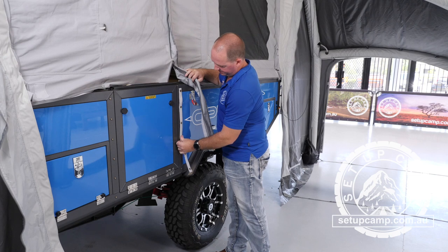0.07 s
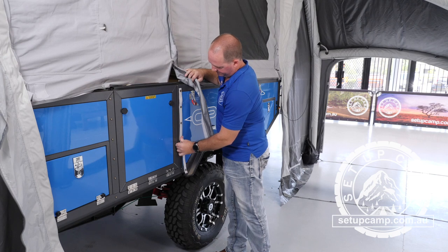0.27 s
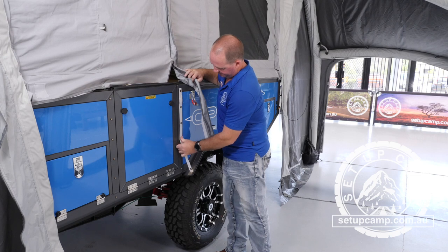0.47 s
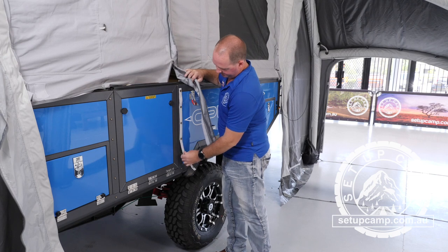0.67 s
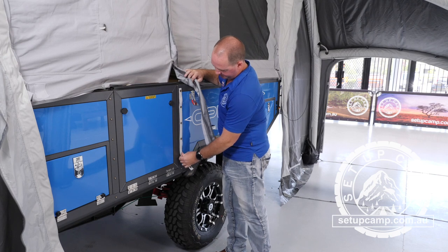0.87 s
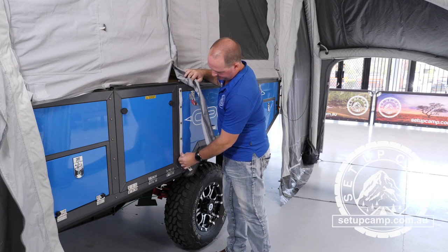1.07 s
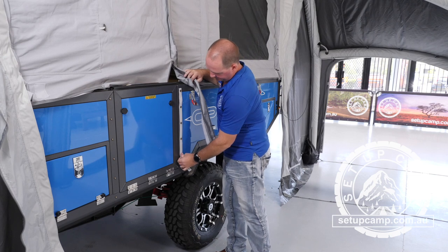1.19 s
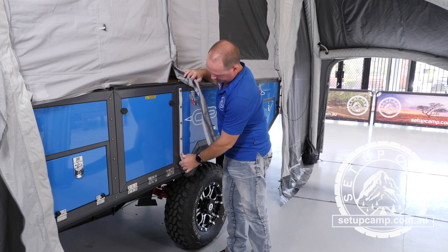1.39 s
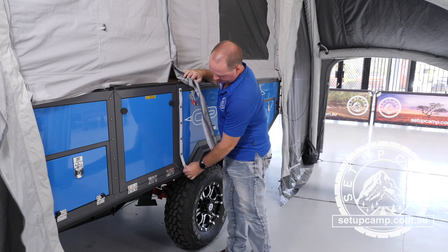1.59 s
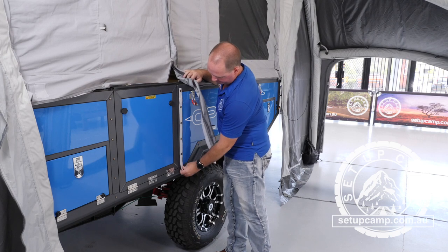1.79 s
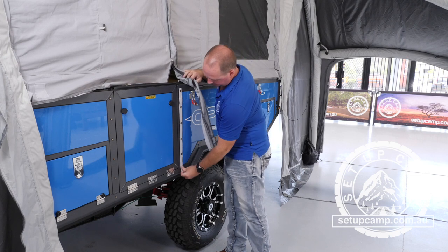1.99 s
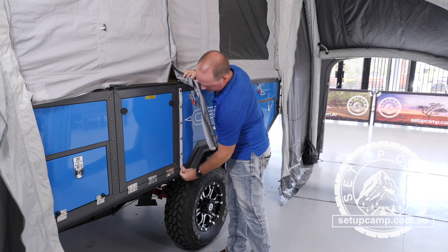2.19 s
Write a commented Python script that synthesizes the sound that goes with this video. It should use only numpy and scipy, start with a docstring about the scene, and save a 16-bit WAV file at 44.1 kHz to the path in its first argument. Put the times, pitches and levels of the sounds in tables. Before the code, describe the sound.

Hook-and-loop strip tugged and ripped apart in scratchy bursts, with sharp snaps and rustling canvas

```python
"""Hook-and-loop strips on a canvas tent flap are worked along a trailer's side, in a large showroom.
From the start the hall rumbles (filtered noise), the canvas rustles and hooks let go (random tiny clicks).
From 0.23 s a stiff edge snaps, the trailer body booms and the panel is knocked (damped ringing).
Long rips come at 0.56, 1.5, 1.7 and 2.1 s, with single ticks between; from 0.7 to 1.46 s a faint low
drone (a gliding sine) ends higher than it began. Short echoes surround all but the booms and the hall."""
import sys
import numpy as np
from scipy import signal
from scipy.fft import rfft, irfft
from scipy.io import wavfile

SR = 44100
rng = np.random.default_rng(int(sys.argv[2]) if len(sys.argv) > 2 else 0)


def transcribe(u):
    """Save the signal u as a 16-bit wav file named by the first command-line argument.

    u: samples, shape (n,) or (channels, n), limited to [-1, 1]; the rate is SR.
    q: integer samples, one column per channel.
    """
    v = np.clip(np.atleast_2d(u).T, -1, 1)
    q = np.round(v * 32767).astype(np.int16)
    wavfile.write(sys.argv[1], SR, q)


N = 99225  # length in samples: 2.25 s


def undb(db):
    """Turn decibels into a plain multiplier."""
    return 10 ** (np.asarray(db) / 20)


def unit(x):
    """Scale to an rms of 1."""
    return x / np.sqrt(np.mean(x ** 2))


def colour(x, points):
    """Filter x through (f/Hz, level/dB) points, with no sound before its cause (minimum phase)."""
    hz, db = np.array(points).T
    size = 8192
    log_f = np.log(np.fft.rfftfreq(size, 1 / SR) + 1)
    gain = undb(np.interp(log_f, np.log(hz), db))
    # folding the cepstrum forward moves all the energy as early as it can go
    cepstrum = irfft(np.log(gain))
    cepstrum[1:size // 2] *= 2
    cepstrum[size // 2 + 1:] = 0
    response = irfft(np.exp(rfft(cepstrum)))
    return signal.fftconvolve(x, response)[:len(x)]


def resonance(f, hz, width_hz):
    """Response of one damped way of ringing, gain 1 at its centre; a wider one dies sooner."""
    return 1j * f * width_hz / (hz ** 2 - f ** 2 + 1j * f * width_hz)


def ring(x, hz, width_hz):
    """Pass x through one resonance."""
    f = np.fft.rfftfreq(2 * N, 1 / SR)
    return irfft(rfft(x, 2 * N) * resonance(f, hz, width_hz))[:N]


def add(out, start, x):
    """Mix x into out from a start time in s."""
    i = max(int(start * SR), 0)
    out[i:i + len(x)] += x[:max(N - i, 0)]


def curve(times, db):
    """Multiplier following a dB curve, practically silent outside it."""
    return undb(np.interp(np.arange(N) / SR, times, db, left=-120, right=-120))


def grains(per_s, scatter_db):
    """Random tiny clicks, a few much stronger than the rest."""
    size = undb(scatter_db * np.minimum(rng.exponential(size=N), 5))
    happens = rng.random(N) < per_s / SR
    return happens * size * rng.choice([-1, 1], N)


# tone of the hall's steady noise: f/Hz, relative level/dB (per Hz)
HALL_COLOUR = [(15, 0), (25, -2.5), (134, 2.5), (256, -3.5), (309, -6.5), (384, -6.5), (516, -16),
               (887, -11.5), (988, -18), (1160, -16), (2840, -26), (3430, -24.5), (7710, -31.5),
               (10400, -36.5), (16000, -31.5)]
HALL_DB = -57.5  # rms level of that noise
# low drone: t/s, f/Hz, rms level/dB
DRONE_PATH = [(0.699, 124, -70), (.88, 123.6, -61.5), (1.0, 120.5, -60.5), (1.10, 127.2, -56.5),
              (1.18, 131.8, -51), (1.24, 140, -60.5), (1.31, 148.7, -55.5), (1.39, 157, -56.5),
              (1.461, 165, -81)]


def hall():
    """Steady rumble and hiss from filtered noise, with a low sine drone that climbs like a far engine."""
    times, hz, db = np.array(DRONE_PATH).T
    pitch = np.interp(np.arange(N) / SR, times, hz)
    phase = 2 * np.pi * np.cumsum(pitch) / SR
    drone = np.sqrt(2) * np.sin(phase) * curve(times, db)
    noise = unit(colour(rng.standard_normal(N), HALL_COLOUR))
    return undb(HALL_DB) * noise + drone


# handling of the canvas: t/s, level/dB
RUSTLE_LEVEL = [(0, -49), (.12, -66.5), (.22, -63.5), (.38, -53.5), (.47, -59), (.55, -51), (.8, -64.5),
                (1.02, -65.5), (1.16, -70.5), (1.3, -72), (1.41, -66), (1.52, -52), (1.68, -64.5),
                (1.88, -64.5), (1.97, -59), (2.04, -75.5), (2.25, -64.5)]
# tone of the creases: f/Hz, relative level/dB
CREASE_COLOUR = [(300, 4), (900, 0), (2000, 0), (4500, -2), (7500, 5), (11000, 3.5), (13000, -1),
                 (16000, -8.5)]
CREASES_PER_S, CREASE_SCATTER_DB = 2500, 3.5
# cloth sliding over the panel: middle t/s, level/dB, half length t/s, centre f/Hz, width f/Hz
CLOTH_SLIDES = [(.74, -63, 0.16, 820, 243), (1.402, -58.5, .045, 4200, 4414),
                (1.422, -60.5, 0.096, 880, 916), (1.566, -51.5, 0.028, 1610, 1370)]


def canvas():
    """Small creases crackle as the flap is handled; now and then the cloth slides softly, as a noise swell."""
    t = np.arange(N) / SR
    creases = unit(colour(grains(CREASES_PER_S, CREASE_SCATTER_DB), CREASE_COLOUR))
    out = curve(*np.array(RUSTLE_LEVEL).T) * creases
    for middle, db, half, hz, width in CLOTH_SLIDES:
        swell = np.exp(-((t - middle) / half) ** 2)
        out += undb(db) * swell * unit(ring(rng.standard_normal(N), hz, width))
    return out


# short tugs on the strip: t/s, level/dB, attack t/s, decay t/s, and, relative to that level,
# backing's rasp level/dB; then f/Hz of the taut strip and its ring's relative level/dB
STRIP_TUGS = [(.002, -46, 0.0015, 0.019, -3.5, 10300, -11), (.175, -59, 0.01, 0.0057, 0, 11600, 4),
              (0.2261, -35, .001, 0.0053, -9, 9500, -12.5), (0.3053, -31.5, 0.00073, .0015, -4, 5800, 0),
              (.350, -63, 0.0042, 0.019, 9.5, 10800, 15.5),
              (0.446, -44.5, 0.0033, 0.0057, -13.5, 7400, -25), (0.523, -40.5, 0.0076, 0.013, -12, 6017, 0),
              (.9250, -27.5, 0.0041, 0.0039, -8, 12200, -11.5),
              (0.937, -39, 0.0024, 0.0082, -1.5, 3220, -12.5), (1.177, -52, .004, 0.0083, 3.5, 5950, -1),
              (1.415, -46, 0.0049, 0.0093, -21, 10700, -15),
              (1.456, -37.5, 0.00071, 0.0071, -7.5, 9700, -2), (1.477, -49, 0.0047, 0.014, -5.5, 9700, -2)]
# long peels, one list each: t/s, hooks' crackle level/dB, backing's rasp level/dB (both before the trims)
LONG_PEELS = [
    [(0.56, -63, -58), (0.582, -33, -45.5), (0.6, -30, -38.5), (0.642, -32, -45), (0.742, -41.5, -56),
     (0.76, -57.5, -74), (0.775, -61, -69)],
    [(1.515, -57, -71), (1.529, -43.5, -59.5), (1.571, -36, -44.5), (1.615, -38, -59.5), (1.625, -43, -72),
     (1.647, -48.5, -65), (1.665, -67, -86)],
    [(1.685, -60.5, -76), (1.693, -39, -72), (1.705, -59.5, -88), (1.713, -45, -71), (1.727, -49, -74),
     (1.733, -43, -58.5), (1.773, -44, -67), (1.781, -70.5, -67), (1.785, -64, -60)],
    [(2.08, -92, -83), (2.086, -65, -93), (2.09, -60, -71), (2.104, -59.5, -95), (2.118, -54, -71),
     (2.14, -48.5, -64), (2.155, -75, -79)],
]
HOOK_TRIM_DB, BACKING_TRIM_DB = -5, -.5  # added to the two levels of the long peels
# tone of the hooks' crackle: f/Hz, relative level/dB
HOOK_TONE = [(2500, -28.5), (5000, -5), (7000, -4.5), (8200, 0), (8900, -1.5), (9600, -1.5), (11000, 1),
             (12500, -2), (14000, -6), (16000, -24)]
# tone of the woven backing: f/Hz, relative level/dB
BACKING_TONE = [(300, -32.5), (800, -14), (1300, -3.5), (2200, 1.5), (3200, 5.5), (4500, 5), (5600, -6),
                (8000, -11)]
# ringing pitch in long peels, which climbs in the first, rises then falls in the second,
# and falls then holds after that: t/s, f/Hz
STRIP_GLIDE = [(.58, 8500), (.64, 9300), (.68, 9700), (.75, 10240), (1.53, 8640), (1.60, 10400),
               (1.74, 9300)]
STRIP_RING_DB, PEEL_WIDTH_HZ = -5.5, 850  # ring in a long peel, relative to its crackle
STRIP_WIDTH_HZ = 1000  # ring in a tug
HOOKS_PER_S, HOOK_SCATTER_DB = 15000, 2.3  # rate is at the hardest pull
DENSITY_POWER = 1  # a gentler pull frees fewer hooks
CATCH_PER_S, CATCH_DB = 200, 1.2  # rows of hooks hold and give way


def rips():
    """Hooks let go, denser under a harder pull; they crackle, ring the taut strip and pluck the backing."""
    t = np.arange(N) / SR
    peeling, rasp = np.zeros(N), np.zeros(N)
    for peel in LONG_PEELS:
        times, hook_db, backing_db = np.array(peel).T
        peeling += curve(times, hook_db + HOOK_TRIM_DB)
        rasp += curve(times, backing_db + BACKING_TRIM_DB)
    pulls = []
    for start, db, attack, decay, *_ in STRIP_TUGS:
        rise = np.clip((t - start) / attack, 0, 1)
        fall = np.exp(-np.maximum(t - start - attack, 0) / decay)
        pulls.append(undb(db) * rise * fall)
    crackle = peeling + sum(pulls)

    rate = HOOKS_PER_S * np.maximum(crackle / crackle.max(), .03) ** DENSITY_POWER
    row = np.arange(N) // int(SR / CATCH_PER_S)
    catch = undb(CATCH_DB * rng.standard_normal(N)[row])
    # dividing by the root of the rate keeps density from changing the loudness
    hooks = catch * grains(rate, HOOK_SCATTER_DB) / np.sqrt(rate)

    # a resonance that glides: turn its pitch down to zero, smooth, and turn it back up
    turn = np.exp(2j * np.pi * np.cumsum(np.interp(t, *np.array(STRIP_GLIDE).T)) / SR)
    memory = np.exp(-np.pi * PEEL_WIDTH_HZ / SR)
    gliding = turn * signal.lfilter([1], [1, -memory], hooks / turn)
    strip = peeling * undb(STRIP_RING_DB) * unit(gliding.real)
    for pull, (*_, body_db, hz, ring_db) in zip(pulls, STRIP_TUGS):
        rasp += pull * undb(body_db)
        strip += pull * undb(ring_db) * unit(ring(hooks, hz, STRIP_WIDTH_HZ))
    plucks = hooks * rng.choice([-1, 1], N)
    hook_sound = crackle * unit(colour(hooks, HOOK_TONE))
    backing_sound = rasp * unit(colour(plucks, BACKING_TONE))
    return strip + hook_sound + backing_sound


# single hooks letting go: t/s (before the lag), peak level/dB (before the trim), f/Hz
SINGLE_HOOKS = [(0.0273, -25, 10000), (0.066, -31, 11600), (0.1311, -38, 5900), (0.1865, -25.5, 10500),
                (0.3263, -17, 10100), (0.3324, -14.5, 11300), (0.377, -18.5, 11000), (0.3814, -27, 11500),
                (0.4234, -18, 11050), (0.4494, -28, 11280), (0.4843, -30, 9950), (0.4964, -37, 6420),
                (1.0859, -45, 7890), (1.1194, -35.5, 7300), (1.1817, -27, 5500), (1.3936, -37, 9220),
                (1.4134, -25, 10700), (1.4187, -19.5, 10800), (1.4244, -29, 11100), (1.4541, -17, 10000),
                (1.5294, -27, 10500), (1.5964, -28, 10100), (1.6114, -20, 10500), (1.6444, -27.5, 10200),
                (1.6901, -36, 10400), (1.7145, -30, 9200), (1.7684, -35, 9200), (1.7888, -23, 9400),
                (1.8168, -29.5, 8950), (1.8442, -37, 9960), (1.8587, -42, 9510), (1.8846, -38, 7800),
                (2.136, -34, 10800), (2.2099, -39, 9680)]
TICK_TRIM_DB, TICK_LAG_S = -5, 0.0011  # added to every level and every time
TICK_WIDTH_HZ, TICK_CRACK = 730, 0.12  # TICK_CRACK is the share of a duller crack


def ticks():
    """A lone hook cracks free and rings for under a millisecond."""
    out, f = np.zeros(N), np.fft.rfftfreq(512, 1 / SR)
    for start, db, hz in SINGLE_HOOKS:
        crack = TICK_CRACK * resonance(f, hz=5800, width_hz=1700)
        click = irfft(resonance(f, hz, TICK_WIDTH_HZ) + crack)
        add(out, start + TICK_LAG_S, click / np.abs(click).max() * undb(db + TICK_TRIM_DB))
    return out


BASS_HZ, TREBLE_HZ = 3400, 7000  # bass acts below the first, treble above the second
CONTACT_HZ = 14500  # each blow fades out above this
BOOST_WIDTH_OCT = 0.27


def blows(modes, events):
    """Each blow rings the modes, weighted by where it lands; bending waves bring the lows a little later."""
    out, f = np.zeros(N), np.fft.rfftfreq(4096, 1 / SR) + 1
    body = sum(undb(db) * resonance(f, hz, width) for hz, width, db in modes)
    for start, db, bass_db, treble_db, lag_ms, boost_hz, boost_db in events:
        bass = bass_db / (1 + (f / BASS_HZ) ** 8)
        treble = treble_db / (1 + (TREBLE_HZ / f) ** 8)
        boost = boost_db * np.exp(-(np.log2(f / boost_hz) / BOOST_WIDTH_OCT) ** 2)
        tone = undb(db + bass + treble + boost) / (1 + (f / CONTACT_HZ) ** 10)
        bend = np.exp(-4j * np.pi * lag_ms * np.sqrt(f / 1000))
        # 128 samples of room ahead of the blow keep its onset whole
        add(out, start - 128 / SR, np.roll(irfft(body * tone * bend), 128))
    return out


# ways the strip's stiff edge rings: f/Hz, width f/Hz, relative level/dB
EDGE_MODES = [(262, 70, -18.5), (1000, 250, -15), (1536, 110, -8.5), (2350, 680, -11), (3170, 300, -16),
              (4640, 400, -1), (5150, 1200, -2.5), (6890, 400, -5.5), (7900, 330, -8.5), (9650, 1700, -1.5),
              (10900, 860, -3.5), (14200, 1200, -7)]
# snaps of the edge: t/s, relative level/dB, bass level/dB, treble level/dB,
# lag of the 1 kHz bending wave t/ms, f/Hz that the contact point favours, its boost level/dB
EDGE_SNAPS = [(.2308, 17, 0, 0, 0.21, 4730, 1.5), (.3060, -14.5, 17, -8, 1.6, 5900, -1),
              (1.1825, -17, 11, 3, 1.014, 596, 14.5), (1.9318, -24, 16, 0, 0.86, 4200, 6.5)]


def edge_snaps():
    """The strip's stiff edge snaps and rings in its own modes."""
    return blows(EDGE_MODES, EDGE_SNAPS)


# booms of the hollow trailer body under firmer presses: t/s, level/dB (before the fades), f/Hz, decay t/s
BODY_BOOMS = [(0.231, -42.5, 276.3, .04), (.319, -50, 283, .035), (.93, -49.5, 255.3, 0.033),
              (1.184, -54, 300, 0.026)]


def booms():
    """A firm press sets the hollow body ringing low and briefly, as a fading sine."""
    out, t = np.zeros(N), np.arange(SR // 2) / SR
    soft_start = np.minimum(t / 0.0028, 1)
    for start, db, hz, decay in BODY_BOOMS:
        add(out, start, undb(db) * np.sin(2 * np.pi * hz * t) * np.exp(-t / decay) * soft_start)
    return out


# ways the trailer's side panel rings: f/Hz, width f/Hz, relative level/dB
PANEL_MODES = [(100, 60, -11), (223, 83, -4.5), (583, 270, -9.5), (747, 108, -6), (1260, 270, 3),
               (1770, 200, 1.5), (2240, 340, 2), (2890, 120, 3), (3440, 225, 5), (4360, 700, 1.5),
               (4950, 200, -13), (8570, 230, -1.5), (10000, 1300, -14), (11600, 450, -23),
               (14400, 1300, -17.5)]
# knocks on the panel: t/s, relative level/dB, bass level/dB, treble level/dB,
# lag of the 1 kHz bending wave t/ms, f/Hz that the contact point favours, its boost level/dB
PANEL_KNOCKS = [(0.318, 12.5, -0.5, -6.5, 1.56, 4730, 2), (0.5071, -19, 9, -9, 1.04, 1510, 4.5),
                (0.9033, -16, 4, 7.5, 0.47, 2720, 13.7), (0.9414, -24.5, 11, -10, 0.98, 2300, 4),
                (1.2460, -31.5, 3, 0, 1.05, 3530, 4), (1.3202, -31.5, 0, 12, 1.06, 1600, 5.3),
                (1.466, -24, 6, 2, 1.62, 3300, 4)]


def panel_knocks():
    """Knocks set the trailer's side panel ringing in its own modes."""
    return blows(PANEL_MODES, PANEL_KNOCKS)


# reflections from floor and trailer side: delay t/s, level/dB (before the echo tone)
NEAR_ECHOES = [(.0075, -21), (0.01, -22), (0.0245, -25.5)]
# tone of the reflections: f/Hz, relative level/dB
ECHO_TONE = [(1000, 0), (3400, 0.5), (4600, -6), (6500, 0), (11000, 0)]
ECHO_SMEAR_S = 0.00069
# tent's reverberation: band f/Hz, time to fall by 60 dB t/s, relative level/dB
TENT_TAIL = [(280, 0.39, -1.5), (600, 0.22, -5), (1300, 0.25, -13.5), (3300, 0.25, -16),
             (4640, 0.58, -26.5), (7200, 0.18, -12), (11200, 0.33, -21.5)]


def tent(x):
    """A few scattered near reflections, then a short diffuse tail of fading noise bands."""
    t = np.arange(SR // 2) / SR
    response = np.zeros(len(t))
    response[0] = 1  # the direct sound
    for delay, db in NEAR_ECHOES:
        smear = (t >= delay) * np.exp(-np.abs(t - delay) / ECHO_SMEAR_S)
        scatter = rng.standard_normal(len(t)) * smear
        response += undb(db) * colour(scatter / np.sqrt(np.sum(scatter ** 2)), ECHO_TONE)
    log_f = np.log(np.fft.rfftfreq(len(t), 1 / SR) + 1)
    centres = np.log([row[0] for row in TENT_TAIL])
    # each row of the identity matrix makes one band that overlaps its neighbours
    for share, (hz, t60, db) in zip(np.eye(len(TENT_TAIL)), TENT_TAIL):
        fade = np.exp(-np.log(1000) * t / t60) * np.minimum(t / 0.001, 1)
        band_gain = np.sqrt(np.interp(log_f, centres, share))
        band = irfft(rfft(rng.standard_normal(len(t))) * band_gain)
        response += undb(db) * band * fade / np.sqrt(np.sum(fade ** 2))
    return signal.fftconvolve(x, response)[:N]


def scene():
    """Strip, panel and canvas sound inside the tent, over the booms and the hall's background."""
    near = canvas() + rips() + ticks() + edge_snaps() + panel_knocks()
    return (tent(near) + booms() + hall())[None]


TOP_HZ = 15800


def record(dry):
    """The recorder clips at full scale and cuts the top."""
    low_pass = signal.ellip(8, .2, 70, TOP_HZ, fs=SR, output="sos")
    return signal.sosfilt(low_pass, np.clip(dry, -1, 1))


dry = scene()
out = record(dry)
transcribe(out)
```